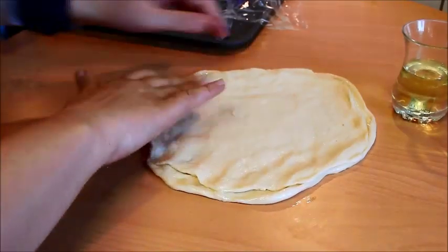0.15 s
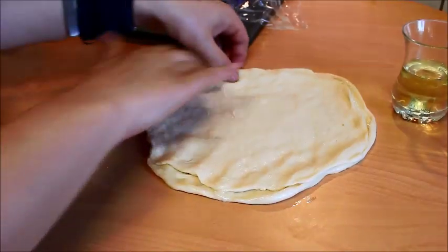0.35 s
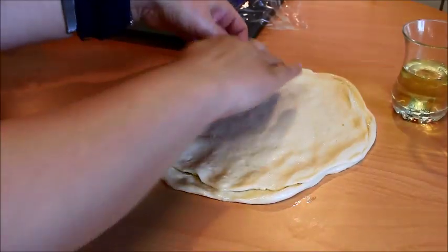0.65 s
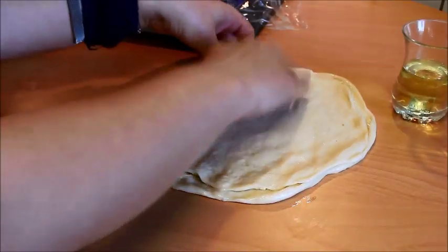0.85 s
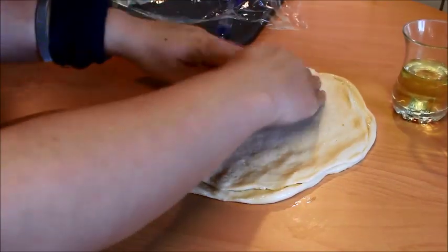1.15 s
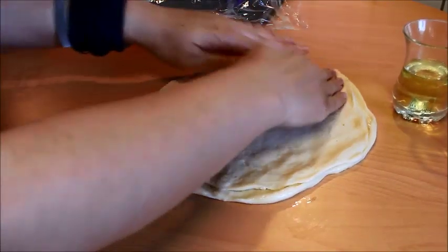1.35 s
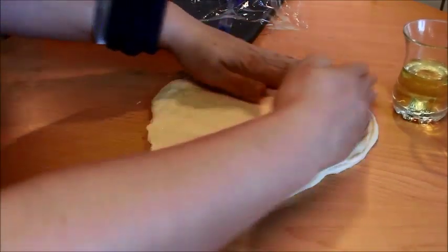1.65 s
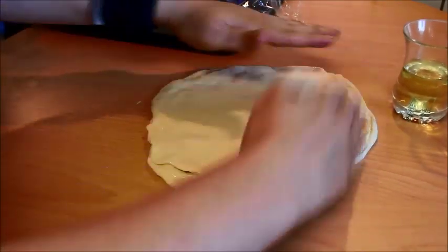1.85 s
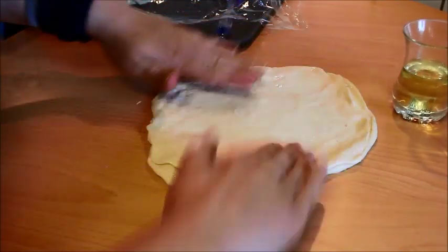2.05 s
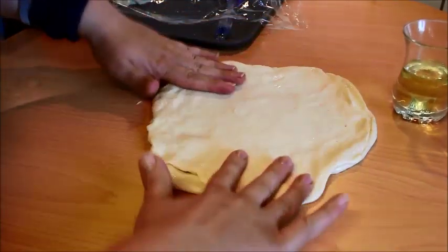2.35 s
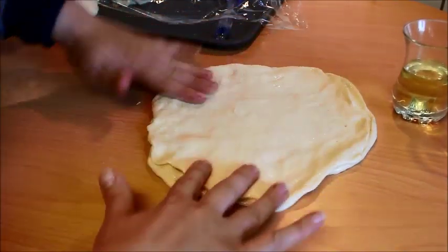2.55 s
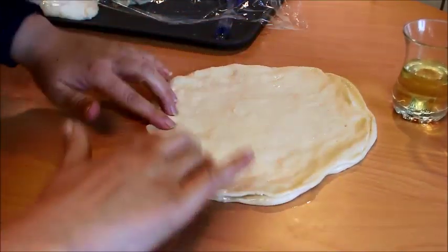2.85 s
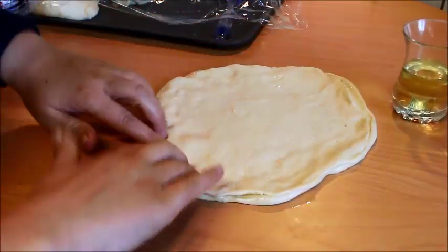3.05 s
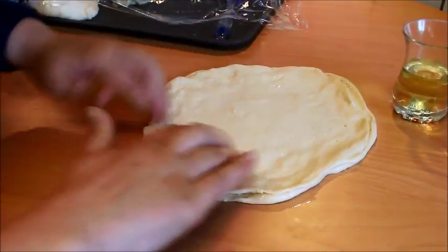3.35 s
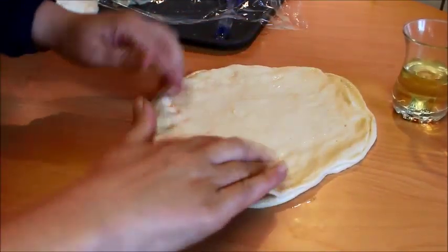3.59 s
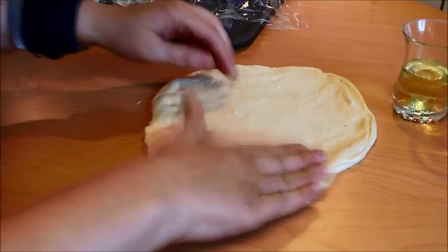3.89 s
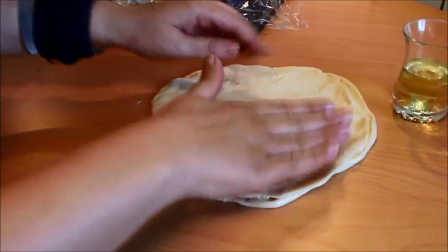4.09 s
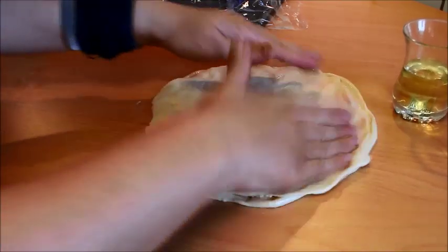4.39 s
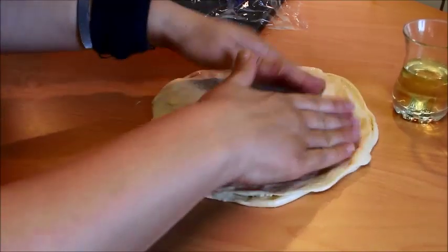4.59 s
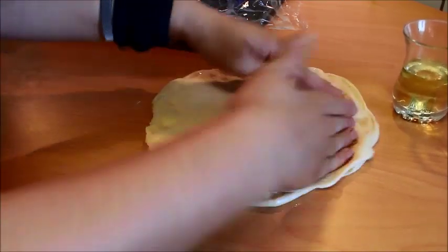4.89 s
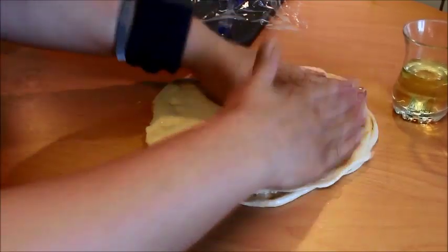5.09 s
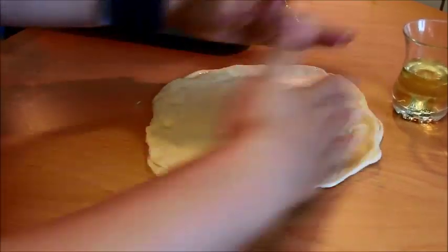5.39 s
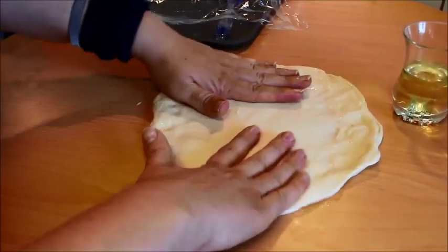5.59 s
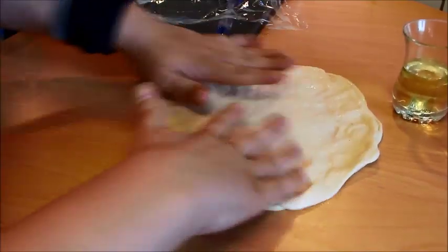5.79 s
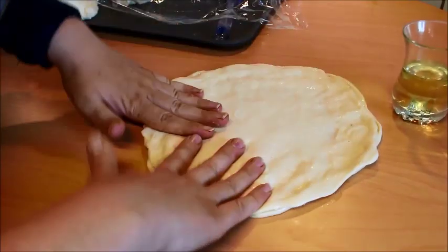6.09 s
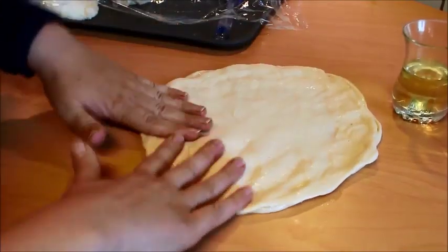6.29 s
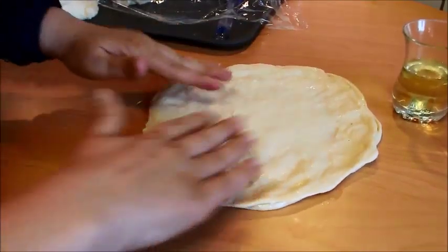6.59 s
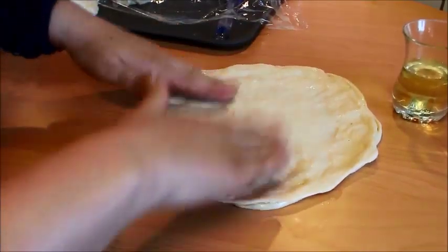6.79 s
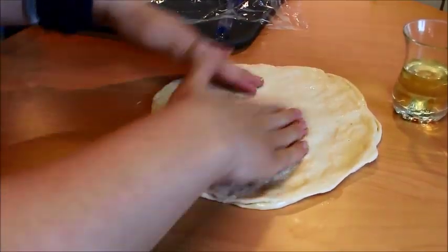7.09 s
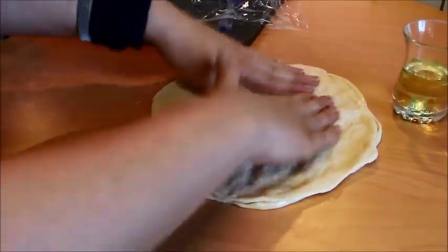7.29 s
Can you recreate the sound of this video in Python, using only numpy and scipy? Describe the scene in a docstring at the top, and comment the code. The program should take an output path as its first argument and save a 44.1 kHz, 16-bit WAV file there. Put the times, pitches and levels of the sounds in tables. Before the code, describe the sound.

A small, quiet kitchen heard from close by, with faint steady room tone and short indoor reverberation. Two hands press oiled dough on a wooden table. From 0 to 2 seconds there are only a few soft, dull pats, at about 0.35, 1.4 and 1.7, with little sticky clicks between as skin peels off. From 2.1 to 3 a quick, light flurry of pats and oily finger smacks, with some low table boom. After 3.4 the thuds get firmer, strong at 4.1 and 4.3, fuller and more woody, with faint squishing, short dry rubs and tacky ticks. Heavy cushioned thumps follow at 5.4, 5.8 and 6.2, the low boom strongest around 6.2. At 7.0 comes the loudest blow: a sharp, wet, cupped slap with a tiny airy pop and ringing wood. Another solid pat at 7.3 has a small hollow plop, and a lighter touch ends it.

```python
"""A small quiet kitchen, heard close: two hands pat and press oiled yeast dough on a wooden table.
Each pat is a soft thud pulse, a clap and oily smack of noise grains, and ringing, booming table modes.
Fingers knead, dab and slide (fluttering noise); sticky skin lets go in ticks (grain bursts).
Air under a cupped palm pops (dying sines). Echoes, banded reverberation and room tone surround it."""
import sys
import numpy as np
from scipy import signal
from scipy.fft import rfft, irfft, next_fast_len
from scipy.io import wavfile

SR = 44100
rng = np.random.default_rng(int(sys.argv[2]) if len(sys.argv) > 2 else 0)


def log_audio(samples):
    """Write samples as a 16-bit WAV file to the path given in sys.argv[1]."""
    # one column per channel
    frames = np.atleast_2d(samples).T
    # limit to full scale, then quantise
    limited = np.clip(frames, -1, 1)
    pcm = np.round(limited * 32767).astype(np.int16)
    wavfile.write(sys.argv[1], SR, pcm)


N = 328104
FRAME_S = 0.03  # a blow's level is its energy averaged over this time

# skin sliding over dough and wood: start_s, length_s, relative_db, centre_hz
RUBS = [(-.04, 0.065, -55, 5400), (0.392, 0.067, -59, 2190), (0.634, 0.066, -59.5, 1770),
        (1.33, 0.13, -61.5, 1460), (3.037, 0.26, -68.5, 3020), (3.722, .06, -58, 3100),
        (3.955, .05, -61, 1810), (4.21, 0.065, -58, 2000), (4.366, 0.1, -62.5, 2820),
        (5.118, 0.16, -59, 1490), (5.342, 0.05, -53.5, 1310), (5.565, 0.28, -59, 4400)]
RUB_HALF_WIDTH_OCT = 0.53

# finger effort, interpolated: time_s, effort_db
HANDWORK_EFFORT = [(0.0, -70.5), (2.18, -67), (2.28, -61), (4.08, -59), (4.27, -58.5), (5.1, -64),
                   (6.51, -65.5), (6.86, -64.5), (7.29, -63.5), (7.44, -58)]
# fingertip touches at full effort
TOUCHES_PER_S, TOUCH_REF_DB, TOUCH_SPREAD_DB = 10, -66, 3

# hand landing on the dough: start_s, palm_weight_db, finger_smack_db
PATS = [(.002, -63, -66.5), (0.3526, -48.5, -64.5), (0.557, -64.5, -67.5), (1.209, -59, -79),
        (1.4351, -52, -79), (1.6946, -47, -71.5), (1.7844, -51.5, -86), (2.1502, -58.5, -56),
        (2.218, -51, -90), (2.344, -62, -66.5), (2.387, -65, -58.5), (2.4452, -49.5, -76),
        (2.6052, -56.5, -66.5), (2.648, -66, -56.5), (2.6841, -47.5, -85), (2.9115, -50.5, -54),
        (3.1452, -57.5, -76), (3.3519, -57, -87), (3.3926, -47.5, -94), (3.6096, -44.5, -89),
        (3.8091, -43, -88), (4.0653, -39, -84), (4.2001, -54, -59.5), (4.323, -39.5, -87),
        (4.4874, -53.5, -60.5), (4.6272, -43.5, -64.5), (4.8053, -58, -71), (4.9683, -43, -69),
        (5.058, -52, -95), (5.1806, -71, -69), (5.3828, -39, -61.5), (5.4758, -46, -90),
        (5.588, -56.5, -60), (5.8309, -38.5, -61), (6.0021, -59, -51), (6.224, -38.5, -65.5),
        (6.4455, -47.5, -70), (6.464, -44.5, -75), (6.6112, -55, -95), (6.7303, -50.5, -58.5),
        (6.971, -44.5, -51.5), (7.0093, -36, -44), (7.1119, -49, -60.5), (7.301, -40, -52.5),
        (7.3882, -46.5, -71)]
# clap against palm weight, against finger smack
CLAP_OF_PALM_DB, CLAP_OF_FINGERS_DB = -11, 4.5
# weight that presses through to the wood; ring lost per dB short of it
PRESS_THROUGH_DB, CUSHIONING_DB_PER_DB = -39, 2.6
# fullest ring of the top; ring against finger smack
FULL_RING_DB, RING_OF_FINGERS_DB = -50, 6
# hand's reach from the table's springy front edge: time_s, reach (0 edge .. 1 across the dough)
REACH = [(.35, 1), (1.75, 0.67), (2.15, .03), (3.8, 0.069), (4.3, 0.59), (4.9, 0.43), (5.4, 1), (6.3, .05),
         (7.0, 0.7)]
# sway against palm weight at the edge; loss at full reach
EDGE_SWAY_DB, REACH_LOSS_DB = -3.5, 32.5
# table-top modes: pitch_hz, relative_db, t60_s
TOP_MODES = [(178.7, 2.5, 0.3), (157, -27, 0.31), (206, -24, 0.13), (367, -9, 0.48), (519.4, -10.5, 0.29),
             (612, -14.5, 0.32), (798, -6, 0.16)]
# boom of the whole table: first_hz, rest_hz, settle_s, t60_s
TABLE_BOOM = (161.4, 64.8, 0.0237, 0.26)

# sticky skin letting go: start_s, relative_db, centre_hz, oiliness_db
TICKS = [(.7617, -46.5, 1500, -6), (1.0565, -41, 2740, -11), (1.1433, -44, 2200, 3.5),
         (1.282, -52.5, 1090, 0), (1.4984, -52, 1300, 12), (1.6152, -45.5, 1640, -2.5),
         (2.5915, -51.5, 2520, 1), (3.08, -50.5, 1400, -5), (3.274, -45.5, 1540, -8), (4.031, -49, 4660, 6),
         (4.2647, -41.5, 1290, -4), (4.362, -42.5, 3360, -9), (4.7227, -38, 1240, -1),
         (6.344, -40, 1500, 3)]
# snapping dough threads, oil-film fizz, dough recoil: levels against the tick
THREADS_DB, THREADS_HALF_WIDTH_OCT = -19, 0.63
FIZZ_DB, FIZZ_HZ, FIZZ_HALF_WIDTH_OCT = -30, 6470, 0.34
RECOIL_DB, RECOIL_HZ, RECOIL_HALF_WIDTH_OCT = -25.5, 744, 0.54

# air squeezed from under the cupped palm: start_s, pitch_hz, level_db, t60_s
AIR_POPS = [(7.01, 2630, -34, 0.0092), (7.009, 3160, -41.5, 0.0034), (7.0097, 2030, -42.5, 0.0064),
            (7.0103, 1333, -41, 0.0098), (7.0107, 348, -35, 0.028), (7.3015, 624, -42.5, 0.029)]

# spectrum of the pressed dough: freq_hz, relative_db_per_hz
KNEAD_COLOUR = [(60, -7), (160, 12.5), (350, 6), (800, -14), (1500, -4), (3000, -34), (8000, -49)]
# spectrum of the breaking sticky bonds: freq_hz, relative_db_per_hz
BOND_COLOUR = [(400, 8), (1300, 10.5), (2500, -1.5), (4500, -10), (6500, -5.5), (9000, -6), (12000, -17),
               (16000, -30)]
# spectrum of the dough's thud: freq_hz, relative_db_per_hz
THUD_COLOUR = [(30, -40.5), (85, -17), (120, -6.5), (155, 3.5), (240, 2.5), (360, -1), (520, -6),
               (680, -21.5), (1000, -19.5), (2000, -31.5), (6000, -53)]
# spectrum of the skin's clap: freq_hz, relative_db_per_hz
CLAP_COLOUR = [(100, -28), (400, 5), (800, 4.5), (1300, -3), (2000, -5), (3000, -8), (4500, -22),
               (8000, -55), (16000, -40)]
# spectrum of the oily smack: freq_hz, relative_db_per_hz
SMACK_COLOUR = [(300, 21), (1200, -19), (2500, 9.5), (4200, 5), (6000, -0.5), (8500, -5), (11000, -11.5),
                (16000, -40)]
# spectrum of the quiet room: freq_hz, relative_db_per_hz
ROOM_TONE_COLOUR = [(15, -34), (25, -2), (79, -4), (126, -11.5), (246, -13.5), (410, -13), (469, -4.5),
                    (552, -8), (782, -6), (871, -7.5), (997, -8.5), (1200, -12.5), (3440, -19.5),
                    (4260, -19), (15500, -31)]
ROOM_TONE_DB = -67.5

# reflections from nearby surfaces: delay_s, level_db
ECHOES = [(.0054, -17.5), (0.0123, -26), (0.0186, -15), (.0316, -23.5)]
# decay of the kitchen: freq_hz, t60_s
ROOM_T60 = [(100, 0.15), (350, 0.26), (900, 0.28), (2500, 0.34), (6000, 0.37), (14000, 0.27)]
# reverberation spectrum: freq_hz, relative_db
ROOM_SPECTRUM = [(100, -6.5), (350, -1), (900, 4.5), (2500, 0.5), (6000, 4), (14000, -4.5)]
# left-right correlation of diffuse sound: freq_hz, correlation (-1 .. 1)
LIKENESS = [(60, .9), (150, .96), (300, .96), (600, .86), (1200, .74), (2500, .6), (5000, .25), (9000, 0),
            (15000, -.3)]
CUTOFF_HZ = 15750


def from_db(db):
    """Decibels to gain."""
    return 10 ** (np.asarray(db) / 20)


def at_hz(points, hz):
    """Read a table along a log-frequency axis."""
    known_hz, values = np.transpose(points)
    return np.interp(np.log(np.maximum(hz, 1)), np.log(known_hz), values)


def unit(x):
    """Scale to an energy of one."""
    return x / np.sqrt(np.sum(x ** 2))


def add(out, start_s, sound):
    """Mix a short sound in at start_s."""
    start = int(round(start_s * SR))
    part = sound[max(-start, 0):max(N - start, 0)]
    first = max(start, 0)
    out[first:first + len(part)] += part


def through(x, response):
    """Convolve a sound with an impulse response."""
    return signal.oaconvolve(np.atleast_2d(x), np.atleast_2d(response), axes=-1)[:, :N]


def colour(x, spectrum, size=4096):
    """Causal minimum-phase filter with the given spectrum; white noise keeps its power."""
    gain = from_db(at_hz(spectrum, np.fft.rfftfreq(size, 1 / SR)))
    cepstrum = irfft(np.log(gain))
    cepstrum[1:size // 2] *= 2
    cepstrum[size // 2 + 1:] = 0
    return through(x, unit(irfft(np.exp(rfft(cepstrum)))))


def around(x, hz, half_width_oct):
    """Broad resonance around a centre; white noise keeps its power."""
    edges_hz = hz * 2 ** (max(half_width_oct, 0.05) * np.array([-1, 1]))
    edges_hz = np.minimum(edges_hz, [SR / 3, SR * 0.45])
    sos = signal.butter(2, edges_hz, "band", fs=SR, output="sos")
    return signal.sosfilt(sos, x) * np.sqrt(SR / 2 / np.diff(edges_hz))


def stereo_noise(size):
    """White noise at two close microphones, correlated by frequency as in LIKENESS."""
    mid, side = rfft(rng.standard_normal((2, size)))
    alike = np.clip(at_hz(LIKENESS, np.fft.rfftfreq(size, 1 / SR)), -1, 1)
    common = np.sqrt((1 + alike) / 2) * mid
    opposed = np.sqrt((1 - alike) / 2) * side * [[1], [-1]]
    return irfft(common + opposed, size)


def flutter(per_s, depth_db):
    """Random wavering gain of unit power, bounded before scaling to twice depth_db either way."""
    knots = 2 * np.tanh(rng.standard_normal(N // 20) / 2)
    wander = np.interp(np.arange(N) / SR * per_s, np.arange(len(knots)), knots)
    gain = from_db(depth_db * wander)
    return gain / np.sqrt(np.mean(gain ** 2))


def mode(hz, t60_s, swells=False):
    """Dying sine of unit energy; a swelling one takes some cycles to build up."""
    t = np.arange(SR // 2) / SR
    return unit(np.sin(2 * np.pi * hz * t) * from_db(-60 * t / t60_s) * (t if swells else 1))


def blows(times_s, levels_db):
    """One impulse a blow, holding the energy of its level over one frame."""
    out = np.zeros(N)
    places = np.clip(np.round(np.asarray(times_s) * SR).astype(int), 0, N - 1)
    np.add.at(out, places, from_db(levels_db) * np.sqrt(FRAME_S * SR))
    return out


def shower(rise_s, decay_s, grain_db):
    """Tiny contacts of uneven size that thicken and die; energy of one frame."""
    t = np.arange(SR // 10) / SR
    sizes, spread = rng.standard_normal((2, len(t)))
    envelope = (1 - np.exp(-t / rise_s)) * np.exp(-t / decay_s)
    return unit(sizes * from_db(grain_db * spread) * envelope) * np.sqrt(FRAME_S * SR)


def patter(times_s, levels_db, rise_s, decay_s, grain_db):
    """A fresh shower of contacts for each blow."""
    out = np.zeros(N)
    for start_s, db, decay in zip(times_s, levels_db, np.broadcast_to(decay_s, len(times_s))):
        add(out, start_s, from_db(db) * shower(rise_s, decay, grain_db))
    return out


def rubs():
    """Sliding skin sticks and slips in fine grains that swell and fade with the stroke."""
    out, n = np.zeros(N), np.arange(N)
    slips = rng.standard_normal(N) * flutter(per_s=1800, depth_db=5.5) * flutter(per_s=34, depth_db=5)
    for start_s, length_s, db, hz in RUBS:
        span = n[max(int(start_s * SR), 0):max(int((start_s + length_s) * SR), 2)]
        stroke = np.sqrt(abs(np.sin(np.pi * (span / SR - start_s) / length_s)))
        out[span] += from_db(db - 9) * stroke * around(slips[span], hz, RUB_HALF_WIDTH_OCT)
    return out


def handwork():
    """Pressing squishes dough in soft lumps; the harder the press, the more sticky bonds break."""
    effort = from_db(np.interp(np.arange(N) / SR, *np.transpose(HANDWORK_EFFORT)))
    lumps = rng.standard_normal(N) * flutter(per_s=70, depth_db=4)
    bonds_per_s = 300  # at full effort
    breaks = rng.random(N) < bonds_per_s * (effort / effort.max()) ** 2 / SR
    crackle = breaks * rng.standard_normal(N) / 2 * np.sqrt(SR / bonds_per_s)
    kneading = from_db(-8.5) * colour(effort * lumps, KNEAD_COLOUR)
    return kneading + from_db(-8) * colour(effort * crackle, BOND_COLOUR)


def room_tone():
    """Steady coloured stereo noise of the quiet room."""
    return from_db(ROOM_TONE_DB) * colour(stereo_noise(N), ROOM_TONE_COLOUR)


def thuds(times_s, thud_db):
    """Dough cushions the blow to one soft pulse; the rest of the hand settles after it."""
    landing = from_db(-3) * blows(times_s, thud_db)
    settling = from_db(-4) * patter(times_s, thud_db, rise_s=0.011, decay_s=0.011, grain_db=4)
    return colour(landing + settling, THUD_COLOUR)


def skin(times_s, clap_db, smack_db):
    """A dry palm claps softly and longer; oily fingers snap fast and crackle after."""
    dryness = np.clip((clap_db - smack_db - 1.5) / 10, 0, 1)
    contact_s = 0.0037 + 0.011 * dryness
    clap = from_db(-1) * patter(times_s, clap_db, rise_s=0.0022, decay_s=contact_s, grain_db=6)
    snap = patter(times_s, smack_db, rise_s=0.0015, decay_s=0.003, grain_db=5)
    crackle = patter(times_s, smack_db, rise_s=0.0049, decay_s=0.0071, grain_db=16)
    smack = from_db(3.5) * snap + from_db(-6) * crackle
    return colour(clap, CLAP_COLOUR) + colour(smack, SMACK_COLOUR)


def table(times_s, ring_db, sway_db):
    """The top rings at once; the boom of the whole table swells later and falls in pitch."""
    top = sum(from_db(db) * mode(hz, t60_s) for hz, db, t60_s in TOP_MODES)
    first_hz, rest_hz, settle_s, t60_s = TABLE_BOOM
    t = np.arange(SR // 2) / SR
    hz = rest_hz + (first_hz - rest_hz) * np.exp(-t / settle_s)
    boom = unit(np.sin(2 * np.pi * np.cumsum(hz) / SR) * t * from_db(-60 * t / t60_s))
    return through(blows(times_s, ring_db), top) + through(blows(times_s, sway_db), boom)


def pats():
    """Weight and smack set clap and ring; the table sways most when struck near its edge."""
    times_s, weight_db, smack_db = np.transpose(PATS)
    palm_clap = from_db(weight_db + CLAP_OF_PALM_DB)
    finger_clap = from_db(smack_db + CLAP_OF_FINGERS_DB)
    clap_db = 20 * np.log10(np.hypot(palm_clap, finger_clap))
    pressed_db = FULL_RING_DB - CUSHIONING_DB_PER_DB * (PRESS_THROUGH_DB - weight_db)
    ring_db = np.minimum(np.maximum(pressed_db, smack_db + RING_OF_FINGERS_DB), FULL_RING_DB)
    reach = np.interp(times_s, *np.transpose(REACH))
    sway_db = weight_db + EDGE_SWAY_DB - REACH_LOSS_DB * reach
    patting = thuds(times_s, weight_db) + skin(times_s, clap_db, smack_db)
    return patting, table(times_s, ring_db, sway_db)


def touches():
    """Fingertips dab at random, more often and more firmly the harder the hands work."""
    times_s = np.sort(rng.uniform(0, N / SR, size=150))  # candidates, thinned below
    chance, strength = rng.random(len(times_s)), rng.standard_normal(len(times_s))
    effort_db = np.interp(times_s, *np.transpose(HANDWORK_EFFORT))
    effort_db = effort_db - effort_db.max()
    lands = chance < TOUCHES_PER_S * from_db(effort_db) * N / SR / len(times_s)
    db = (TOUCH_REF_DB + effort_db / 2 + TOUCH_SPREAD_DB * strength)[lands]
    return thuds(times_s[lands], db - 3) + skin(times_s[lands], clap_db=db - 3, smack_db=db - 9.5)


def ticks():
    """Dough threads break in a short burst; the oil film fizzes and the dough snaps back."""
    out = np.zeros(N)
    for start_s, db, hz, oil_db in TICKS:
        burst = shower(rise_s=0.00062, decay_s=0.0029, grain_db=15.5)
        threads = from_db(THREADS_DB) * around(burst, hz, THREADS_HALF_WIDTH_OCT)
        fizz = from_db(FIZZ_DB + oil_db) * around(burst, FIZZ_HZ, FIZZ_HALF_WIDTH_OCT)
        recoil = from_db(RECOIL_DB) * around(burst, RECOIL_HZ, RECOIL_HALF_WIDTH_OCT)
        add(out, start_s, from_db(db) * (threads + fizz + recoil))
    return out


def air_pop():
    """Air pocketed under the palm rings for a few cycles."""
    return sum(through(blows([start_s], [db]), mode(hz, t60_s, swells=True))
               for start_s, hz, db, t60_s in AIR_POPS)


def echoed(x, wall_hz):
    """Add the dull early reflections of floor, cupboards and walls."""
    lowpass = signal.butter(1, min(wall_hz, SR / 3), fs=SR, output="sos")
    dull = signal.sosfilt(lowpass, x)[0]
    n = np.arange(N)
    return x + sum(from_db(db) * np.interp(n - delay_s * SR, n, dull, left=0)
                   for delay_s, db in ECHOES)


def reverberation(x, build_s):
    """Diffuse kitchen sound: third-octave energy builds and dies, carried by scrambled-phase noise."""
    edges_hz = 70 * 2 ** (np.arange(25) / 3)
    white = [stereo_noise(next_fast_len(N, True))[:, :N] for _ in range(2)]
    build = np.exp(-1 / (build_s * SR))
    out = 0
    for k, (low_hz, high_hz) in enumerate(zip(edges_hz, edges_hz[1:])):
        band = signal.butter(2, [low_hz, high_hz], "band", fs=SR, output="sos")
        hz = np.sqrt(low_hz * high_hz)
        keep = from_db(-60 / (at_hz(ROOM_T60, hz) * SR)) ** 2  # energy kept per sample
        fed = signal.lfilter([1 - build], [1, -build], signal.sosfilt(band, x[0]) ** 2)
        stored = signal.lfilter([1 - keep], [1, -keep], fed)
        # neighbouring bands take different noise
        diffuse = signal.sosfilt(band, white[k % 2]) * np.sqrt(SR / 2 / (high_hz - low_hz))
        out = out + from_db(at_hz(ROOM_SPECTRUM, hz)) * np.sqrt(stored) * diffuse
    return out


def afterglow(x, t60_s):
    """A pitched sound keeps its pitch as it bounces round the kitchen."""
    t = np.arange(SR // 2) / SR
    return through(x, np.sqrt(2) * unit(stereo_noise(len(t)) * from_db(-60 * t / t60_s)))


def scene():
    """Hands and table close by, the kitchen around them."""
    patting, wood = pats()
    hands = rubs() + handwork() + patting + touches() + ticks()
    pop = air_pop()
    near = echoed(hands + pop, wall_hz=2300) + wood
    far = from_db(-1.5) * reverberation(hands, build_s=0.00027)
    far = far + from_db(-3.5) * afterglow(pop, t60_s=0.4)
    balance = from_db([[-0.7], [0.7]])  # left, right
    return (near + far + room_tone()) * balance


def record(dry):
    """The microphone sheds the deepest bass; the top is cut steeply."""
    thin = signal.sosfilt(signal.butter(2, 46, "high", fs=SR, output="sos"), dry)
    steep = signal.ellip(10, 0.1, 70, CUTOFF_HZ, fs=SR, output="sos")
    return signal.sosfilt(steep, thin)


dry = scene()
out = record(dry)
log_audio(out)
```